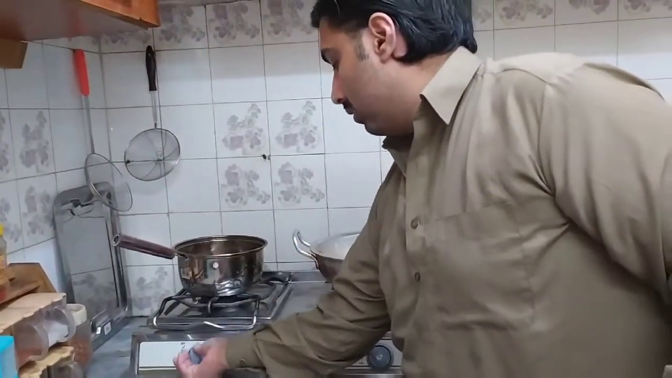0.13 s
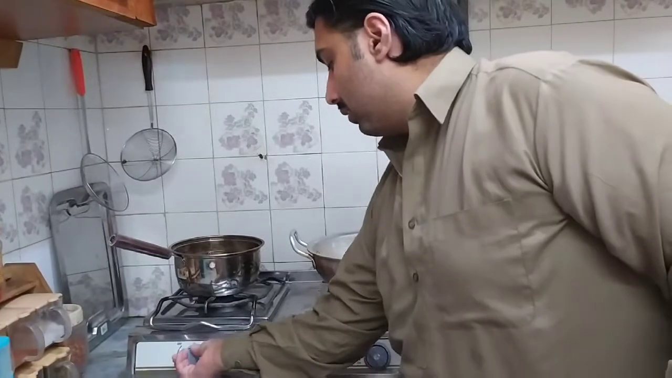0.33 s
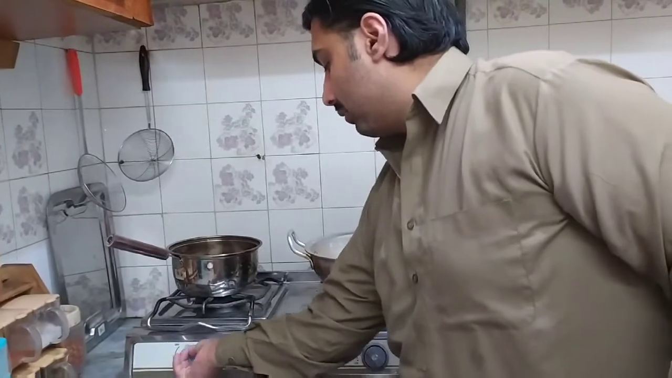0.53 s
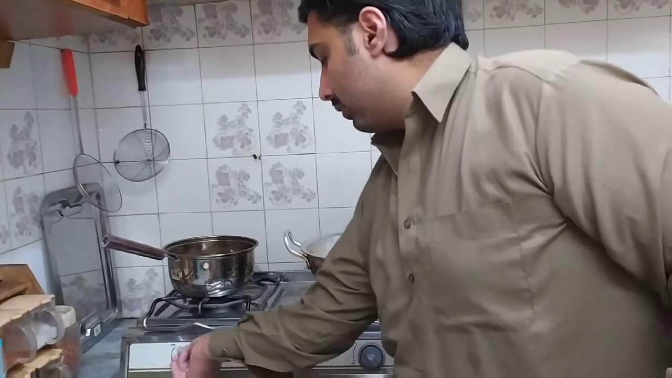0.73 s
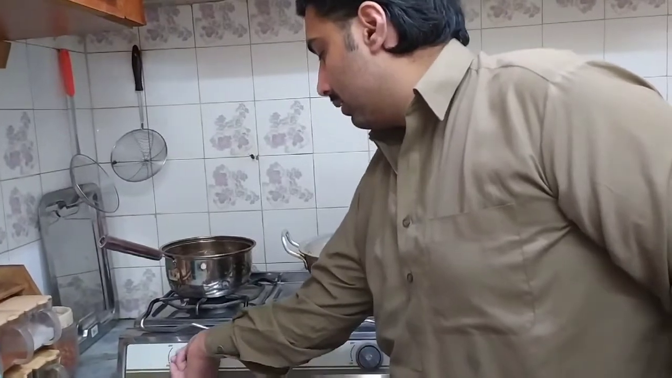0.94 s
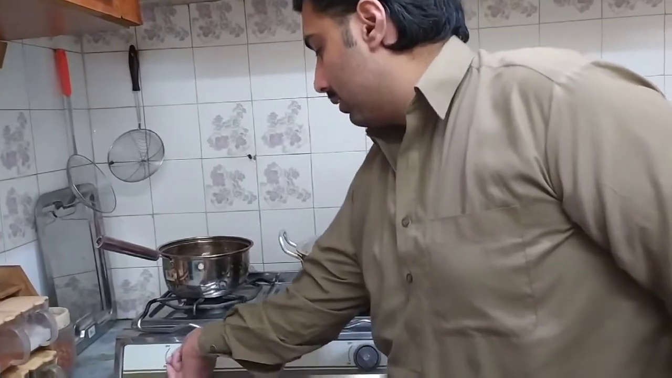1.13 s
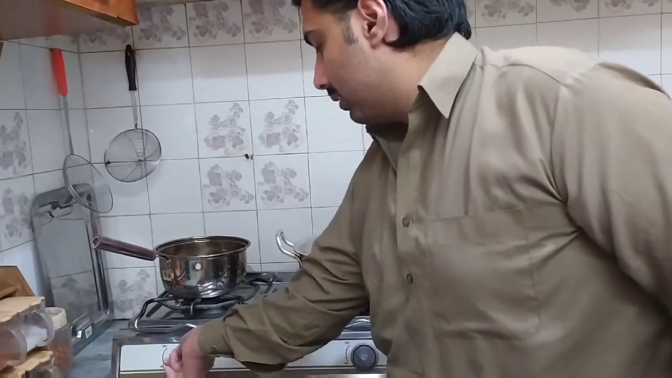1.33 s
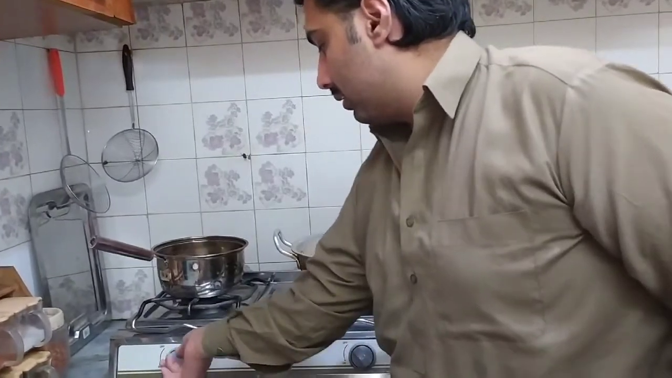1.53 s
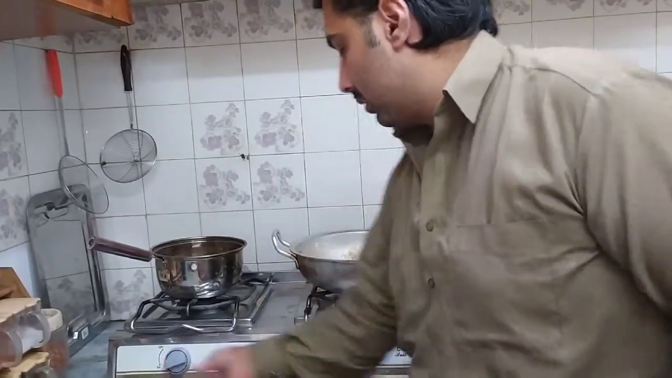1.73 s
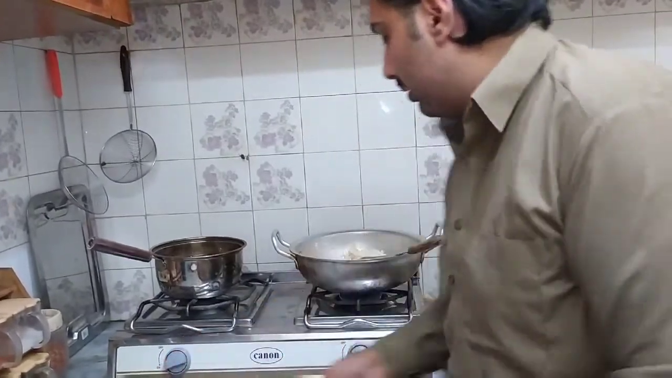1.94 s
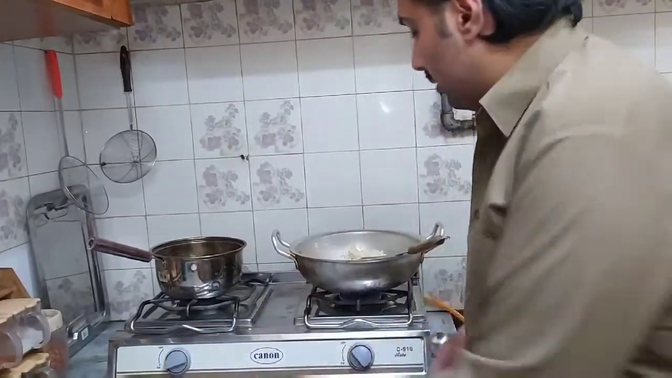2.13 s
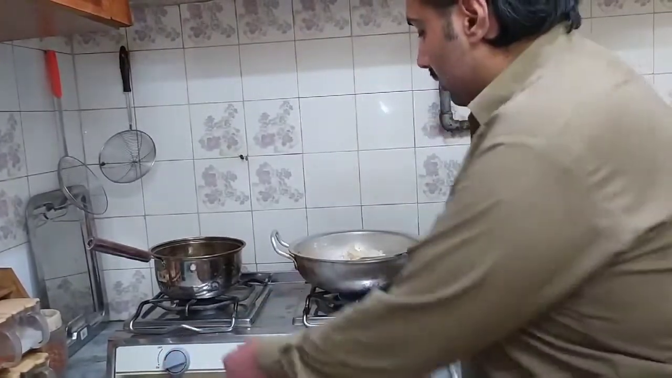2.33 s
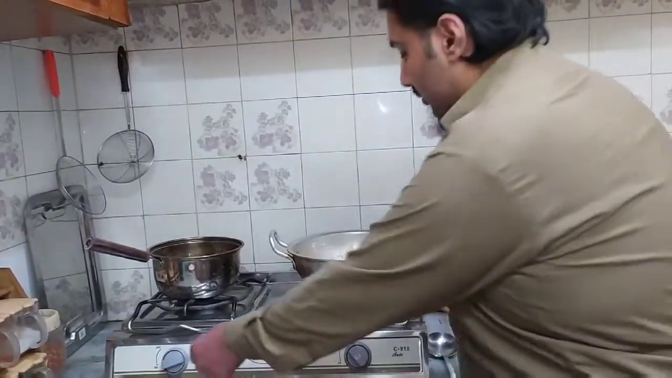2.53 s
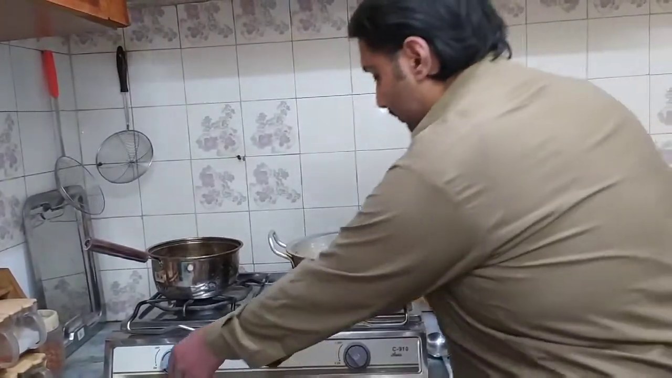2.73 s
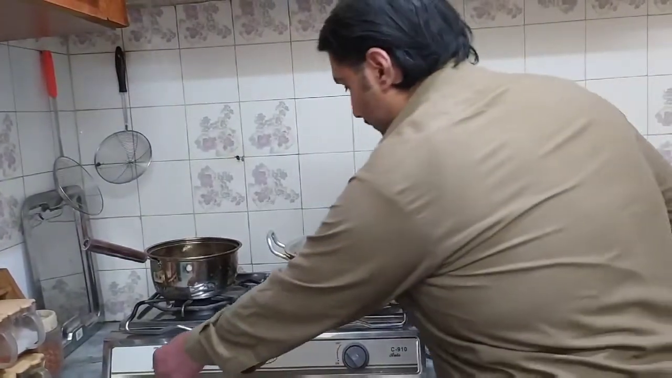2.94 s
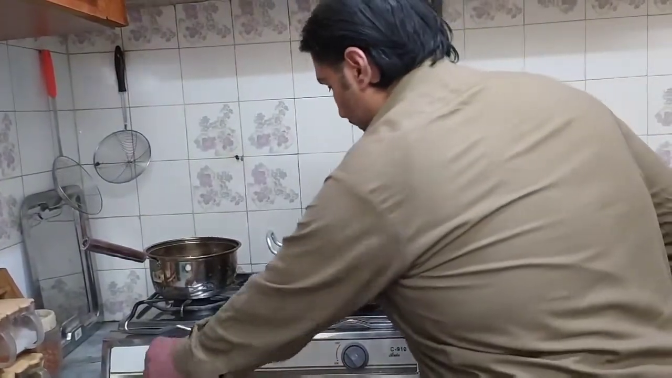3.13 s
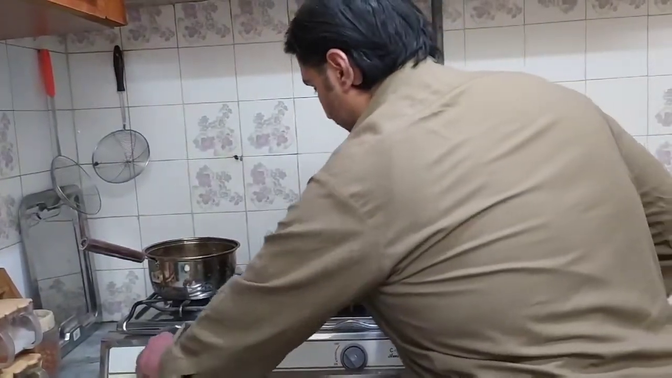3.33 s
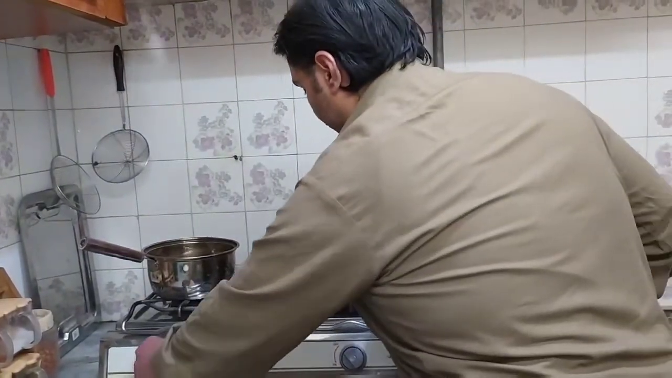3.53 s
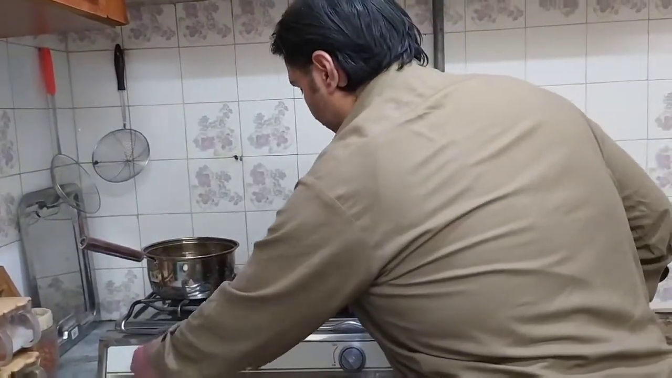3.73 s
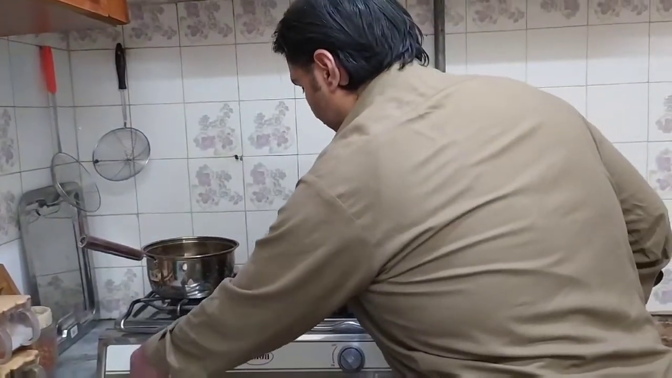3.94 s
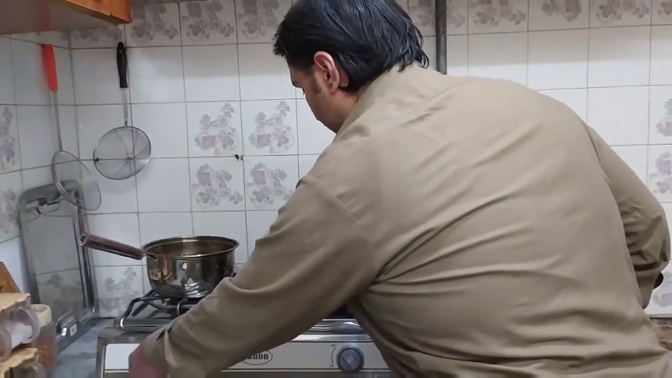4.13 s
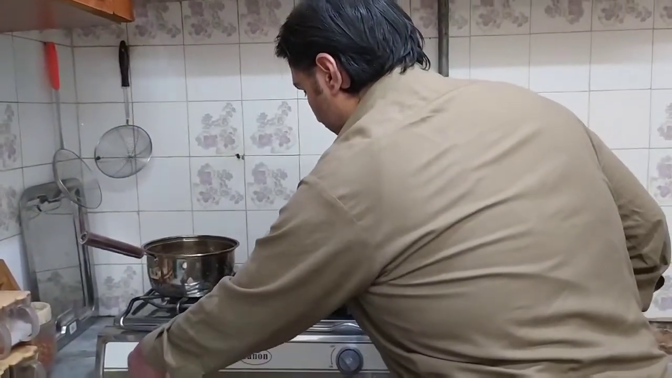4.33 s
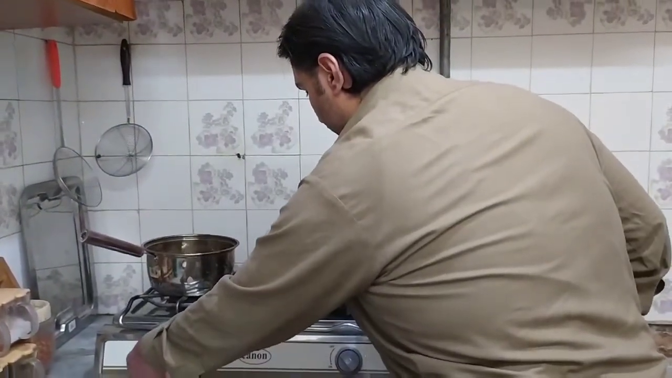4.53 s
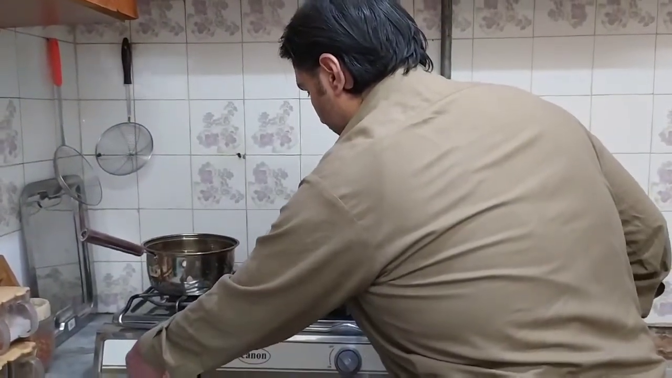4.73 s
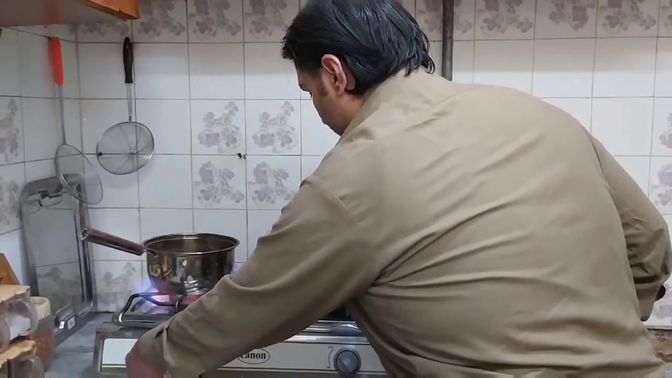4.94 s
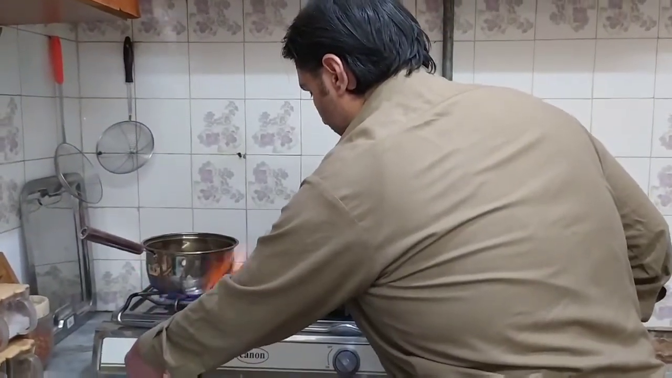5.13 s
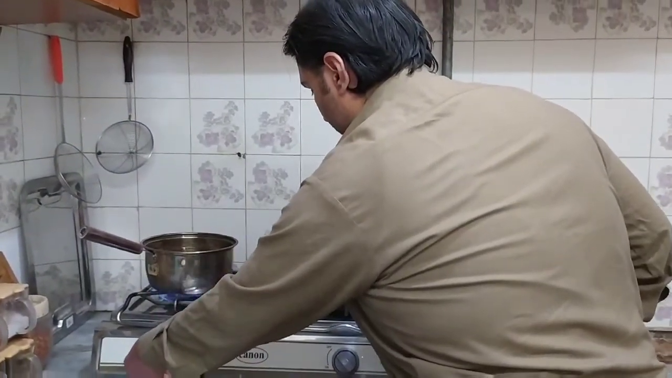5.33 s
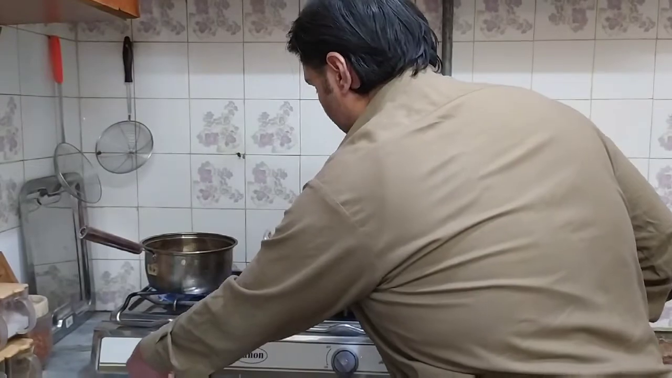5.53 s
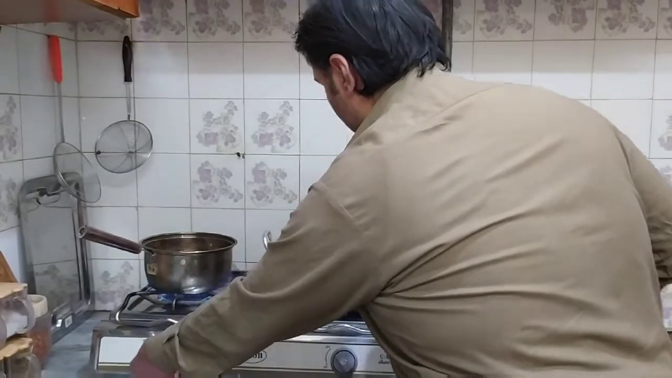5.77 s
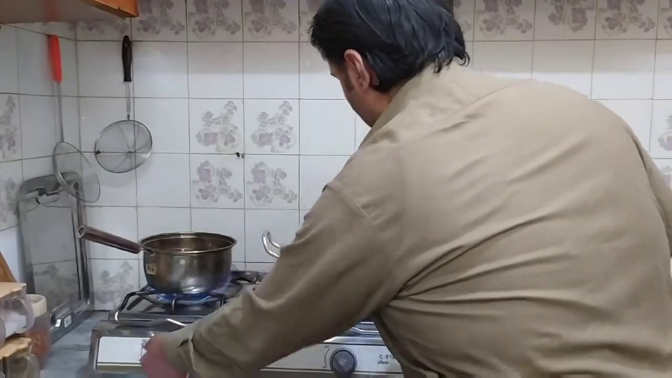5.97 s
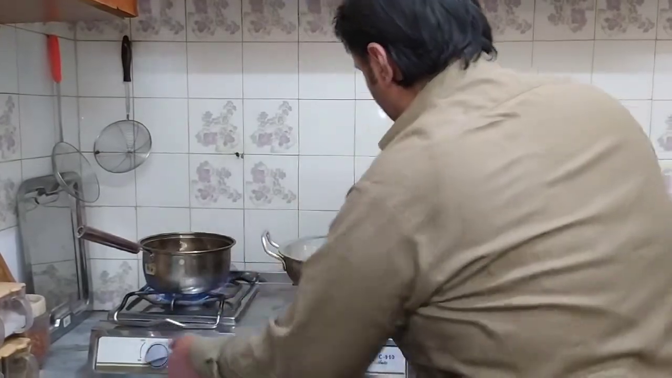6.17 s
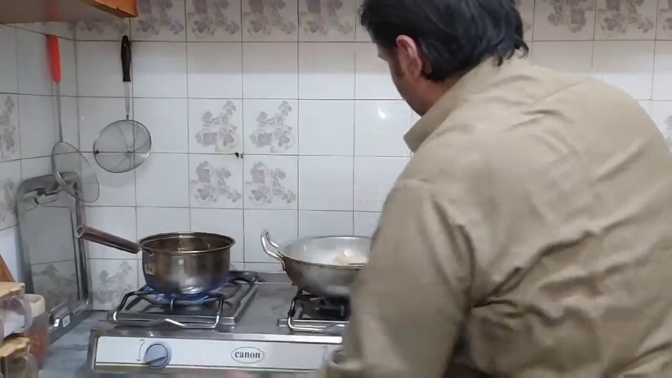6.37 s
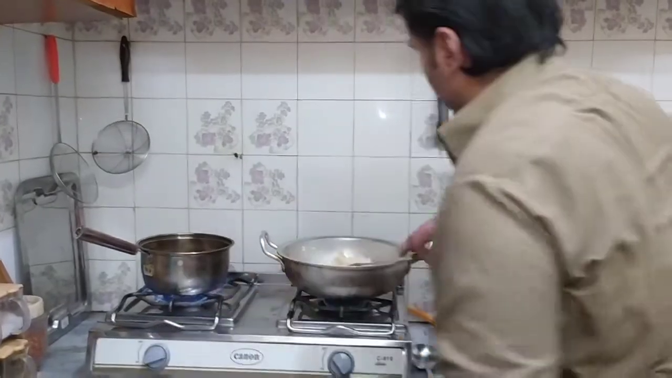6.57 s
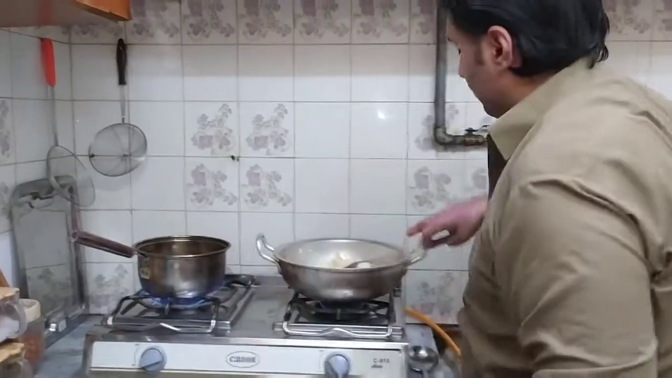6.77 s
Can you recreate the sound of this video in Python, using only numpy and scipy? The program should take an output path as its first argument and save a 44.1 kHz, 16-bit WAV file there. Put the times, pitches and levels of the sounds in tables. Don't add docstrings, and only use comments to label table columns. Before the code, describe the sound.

Thin gas hiss starts and stops around loud metallic igniter cracks, until the third snap lights a low, rough rush of flame under a pot.

```python
import sys
import numpy as np
from scipy import signal
from scipy.fft import rfft, irfft, next_fast_len
from scipy.io import wavfile
from scipy.ndimage import uniform_filter1d, map_coordinates

SR = 44100
rng = np.random.default_rng(int(sys.argv[2]) if len(sys.argv) > 2 else 0)


def elevation(decibels):
    levels = np.asarray(decibels, float)
    return 10 ** (levels / 20)


def inscribe(sig):
    pcm = np.round(np.clip(np.atleast_2d(sig).T, -1, 1) * 32767)
    wavfile.write(sys.argv[1], SR, pcm.astype(np.int16))


N = 299990


def unit(x):
    return x / np.sqrt(np.mean(x ** 2) + 1e-20)


def along(points, hz):
    f, v = np.transpose(points)
    return np.interp(np.log(hz + 1), np.log(f + 1), v)


def wobble(rate_hz, count=N):
    knots = rng.standard_normal(int(count * rate_hz / SR) + 4)
    return map_coordinates(knots, [np.arange(count) * rate_hz / SR])


def filtered(x, response):
    m = next_fast_len(len(x) + SR // 4)
    return irfft(rfft(x, m) * response(np.fft.rfftfreq(m, 1 / SR)), m)[:len(x)]


def shape(points):
    below = [(0, -120), (points[0][0] * 0.7, -70)]
    above = [(points[-1][0] * 1.05, -120)]
    return lambda hz: elevation(along(below + list(points) + above, hz))


def resonances(peaks):
    def response(f):
        total = 0
        for k, (centre_hz, width_hz, db) in enumerate(peaks):
            damping = 1j * f * width_hz
            total = total + (-1) ** k * elevation(db) * damping / (centre_hz ** 2 - f * f + damping)
        return total
    return response


def noise(response, count=N):
    return unit(filtered(rng.standard_normal(count), response))


def causal(x, points):
    gain = shape(points)(np.fft.rfftfreq(4096, 1 / SR))
    cepstrum = irfft(np.log(np.maximum(gain, 1e-5)))
    cepstrum[1:2048] *= 2
    cepstrum[2049:] = 0
    return signal.fftconvolve(x, irfft(np.exp(rfft(cepstrum))))[:len(x)]


def tail(scale, sparse_db):
    # (frequency [Hz], t60 [s])
    kitchen_t60 = [(100, 1.1), (300, 0.71), (700, 0.77), (1800, 0.62), (5000, 0.6), (9000, 0.46),
                   (14000, 0.47)]
    t = np.arange(SR) / SR
    sparse = elevation(sparse_db * np.exp(-t / 0.0099) * wobble(900, count=SR))
    echoes = rng.standard_normal(SR) * sparse
    hz, frame_s, z = signal.stft(echoes, SR, nperseg=256)
    t60_s = scale * along(kitchen_t60, hz)[:, None]
    return signal.istft(z * elevation(-60 * frame_s / t60_s), SR, nperseg=256)[1][:SR]


def background():
    # (time [s], level [dB], t60 [s])
    pushes = [(0.0, -53, 1), (.2, -56, 2.3), (1.17, -26, 0.32), (1.4, -53, 1.5), (1.702, -56, .7),
              (3.27, -49.5, 0.68), (4.15, -59, 0.89), (4.93, -33.5, 1.2), (5.5, -53, 0.97),
              (5.85, -58.5, 0.67), (6.1, -54, 0.85), (6.4, -59, .8), (6.65, -62, 1.6)]
    # (frequency [Hz], density [dB per Hz])
    rumble_colour = [(4, -4), (12, 21), (28, 6), (40, -13), (60, -38)]
    # (frequency [Hz], density [dB per Hz])
    floor_colour = [(8.8, -32.5), (15, 11.5), (36, -9), (109, -7.5), (220, -3), (303, -7), (543, -7),
                    (1030, -15.5), (1340, -9), (1850, -16), (2200, -13.5), (3940, -22), (7070, -22),
                    (9190, -20), (16000, -28)]
    floor_db, still_db, push_rise_s = -59.5, -74, 0.026
    t = np.arange(N) / SR
    sway = elevation(still_db)
    for start_s, db, t60_s in pushes:
        since = np.maximum(t - start_s, 0)
        sway = sway + elevation(db - 60 * since / t60_s) * (1 - np.exp(-since / push_rise_s))
    return elevation(floor_db) * noise(shape(floor_colour)) + sway * noise(shape(rumble_colour))


def touches():
    # (time [s], level [dB], rise [s], dull part [dB], bright part [dB])
    contacts = [(.117, -50.5, 0.0033, -3, -15), (.15, -68, 0.027, -3, 5.5), (.2, -64, 0.0089, 8, -4),
                (.46, -60, 0.012, -0.5, 2.5), (.53, -69.5, 0.02, 22.5, -10), (.56, -70, 0.011, 21.5, -12),
                (.635, -81, 0.011, 15, -8), (2.335, -54.5, 0.0094, -0.5, 8), (2.631, -62, 0.025, -9, 12),
                (2.676, -67, .01, -4, 0), (2.793, -47.5, 0.027, -8.5, 6.5), (2.86, -58, .007, 3, -6),
                (2.954, -63, 0.0036, 13, -6), (3.033, -44.5, .012, -2, -10), (3.069, -51, .009, -1.5, -15),
                (3.109, -64, 0.012, 6, -9), (3.15, -63, .013, -2.1, 1.1), (3.499, -68, 0.015, 16, -9),
                (3.65, -61, 0.014, -2.1, 1), (6.362, -56, 0.022, -2.5, -8)]
    # (frequency [Hz], width [Hz], level [dB])
    dull_peaks = [(247, 42, -2), (420, 44, 7), (657, 35, 3.5), (810, 26, 2), (1020, 76, -5.5)]
    # (frequency [Hz], density [dB per Hz])
    middle_colour = [(400, -46), (900, -2), (1500, -1), (2500, -6), (4000, -35), (6000, -33)]
    # (frequency [Hz], density [dB per Hz])
    bright_colour = [(2500, -0.5), (4000, -1.5), (6500, -2), (9000, -3), (12000, -5), (16000, -25)]
    t60_s = 0.39
    out, t = np.zeros(N + SR), np.arange(SR // 2) / SR
    count = len(t)
    for start_s, db, rise_s, dull_db, bright_db in contacts:
        burst = noise(shape(middle_colour), count)
        burst += elevation(dull_db) * noise(resonances(dull_peaks), count)
        burst += elevation(bright_db) * noise(shape(bright_colour), count)
        grit = elevation(0.33 * wobble(141, count))
        swell = np.minimum(t / rise_s, 1) * elevation(-60 * np.maximum(t - rise_s, 0) / t60_s)
        out[round(start_s * SR):][:count] += elevation(db) * burst * grit * swell
    return out[:N]


def thumps():
    # (time [s], level [dB], frequency [Hz], t60 [s])
    booms = [
        (0.6, -53, 115, 0.29),
        (3.439, -42, 95, 0.21),
        (3.519, -60, 169, .4),
        (3.62, -68, 200, 0.61),
        (3.741, -51, 420, 0.24),
        (5.039, -32, 91.6, 0.45),
        (5.56, -37.5, 232, 0.87),
    ]
    out, t = np.zeros(N + SR), np.arange(SR // 2) / SR
    for start_s, db, hz, t60_s in booms:
        boom = noise(resonances([(hz, 0.027 * hz, 0)]), len(t))
        swell = elevation(db - 60 * t / t60_s) * (1 - np.exp(-t / 0.0099))
        out[round(start_s * SR):][:len(t)] += swell * boom
    return out[:N]


def gas():
    # (open [s], shut [s], flow [dB], jet top at opening [dB], fade of top [dB per s])
    valve = [
        (0.73, 3.23, -54.5, -60, 30),
        (3.792, 6.5, -56, -60, 12),
    ]
    # (frequency [Hz], width [Hz], level [dB])
    tube_peaks = [(1307, 65, -3.5), (2157, 39, -11.5), (2762, 25.4, -7), (3460, 33, -14),
                  (4085, 121, -15.5), (4870, 20, -13.5)]
    # (frequency [Hz], density [dB per Hz])
    tube_bed = [(530, -37), (900, -14), (1330, -6.5), (2760, -14), (3260, -15.5), (4070, -18.5),
                (4470, -52), (4770, -25), (6000, -67), (7800, -54), (13200, -120)]
    # (frequency [Hz], density [dB per Hz])
    jet_colour = [(4550, -43), (4950, -9), (5840, -10.5), (6050, -6.5), (6730, -3.5), (7310, -4.5),
                  (8210, 0), (12500, -19.5), (15400, -25), (16000, -30)]
    # (frequency [Hz], density [dB per Hz])
    top_colour = [(9000, -34), (9800, -6.5), (10500, -0.5), (11200, -7.5), (12000, -24), (14000, -18),
                  (16000, -29)]
    # (frequency [Hz], width [Hz], level [dB])
    ridge_peaks = [(8140, 500, 1), (10100, 600, -1.5)]
    open_db_per_s, shut_db_per_s = 222, 256
    tube_lag_s, top_late_s = 0.053, 0.065
    rush_tube_db, rush_jet_db, rush_s = 2.5, 2, 0.12
    rush_per_fade = 0.025
    jet_db, top_rest_db, ridge_db = -1.5, -18, -4
    settled_flow_db, settled_top_db = -57.5, -76
    t = np.arange(N) / SR
    tube_gain, jet_gain, top_gain, ridge_gain = np.zeros((4, N))
    for open_s, shut_s, flow_db, top_db, fade in valve:
        since = np.maximum(t - open_s, 0)
        edge_db = -open_db_per_s * np.maximum(open_s - t, 0) - shut_db_per_s * np.maximum(t - shut_s, 0)
        rush = rush_per_fade * fade * since / rush_s * np.exp(1 - since / rush_s)
        lag_db = open_db_per_s * np.clip(open_s + tube_lag_s - t, 0, tube_lag_s)
        tube_gain += elevation(flow_db + edge_db - lag_db + rush_tube_db * rush)
        jet_gain += elevation(flow_db + jet_db + edge_db + rush_jet_db * rush)
        ridge_gain += rush * elevation(flow_db + ridge_db + edge_db)
        fading_db = np.maximum(top_db - fade * since, flow_db + top_rest_db)
        top_gain += elevation(fading_db + edge_db - 7.5 * np.exp(-since / top_late_s))
    settled = np.clip((t - valve[-1][1]) / 0.04, 0, 1)
    steady = settled * elevation(settled_flow_db)

    def pipe(hz):
        return resonances(tube_peaks)(hz) / (1 + (1000 / (hz + 1)) ** 4)

    tube = unit(noise(pipe) + elevation(0.5) * noise(shape(tube_bed)))
    surge = elevation(0.7 * wobble(9))
    hiss = (tube_gain + steady) * tube
    hiss += (jet_gain + elevation(jet_db) * steady) * noise(shape(jet_colour))
    hiss += ridge_gain * noise(lambda hz: resonances(ridge_peaks)(hz) ** 2)
    top = elevation(5.5) * (top_gain + settled * elevation(settled_top_db)) * noise(shape(top_colour))
    return surge * hiss + top


def whistle():
    # (time [s], hold [s], pitch [Hz], level [dB], half-pitch level [dB])
    cracks = [
        (0.738, 0.0093, 5480, -45.5, -12),
        (3.188, 0.024, 5410, -52, -0.5),
        (3.796, .03, 5360, -55, -4),
    ]
    # (frequency [Hz], density [dB per Hz])
    spray_colour = [(11500, -32), (13000, -5), (14000, -2), (15000, -6), (16000, -25)]
    rise_db_per_s, fall_db_per_s = 730, 260
    glide_hz, glide_s = 200, 0.024
    flat_hz_per_db = 4
    width_hz, width_hz_per_db = 380, 14
    out, t = np.zeros(N), np.arange(N) / SR
    for start_s, hold_s, hz, db, half_db in cracks:
        under_db = rise_db_per_s * np.maximum(start_s - t, 0)
        under_db += fall_db_per_s * np.maximum(t - start_s - hold_s, 0)
        pitch_hz = hz - glide_hz * np.clip((start_s - t) / glide_s, 0, 2)
        pitch_hz -= flat_hz_per_db * np.minimum(under_db, 40)
        half_phase = np.pi * np.cumsum(pitch_hz) / SR
        gate = np.clip((37 - under_db) / 8, 0, 1)
        blur_hz = width_hz + width_hz_per_db * half_db
        tone = wobble(blur_hz) * np.sin(2 * half_phase) + wobble(blur_hz) * np.cos(2 * half_phase)
        half = wobble(180) * np.sin(half_phase) + wobble(180) * np.cos(half_phase)
        spray = elevation(0.32 * (db - under_db) - 52) * noise(shape(spray_colour))
        out += gate * (elevation(db - under_db) * (tone + elevation(half_db) * half) + spray)
    return out


def igniter():
    # (time [s], peak [dB], hold [s], decay scale [1])
    snaps = [
        (1.164, -5.5, 0.058, 0.82),
        (3.284, -9, 0.039, 0.65),
        (4.9148, -6, 0.019, 0.88),
    ]
    # (frequency [Hz], density [dB per Hz])
    snap_colours = [
        [(35, -46), (60, -28), (108, -29.5), (212, -4.5), (287, -10.5), (389, 1.5), (492, -5.5), (651, -5),
         (1310, -6.5), (1660, -1.5), (3340, -7.5), (4320, -4.5), (5210, -8), (9130, -2), (16000, -25.5)],
        [(35, -92), (60, -63), (222, -28), (315, -41), (437, -12), (593, -27), (882, -17), (1040, -19.5),
         (1660, -13.5), (1820, -11), (2000, -16), (4320, -8.5), (5090, -10), (8920, 0), (16000, -25)],
        [(35, -39), (60, -16), (268, -14.5), (417, -1.5), (666, -6), (803, -13.5), (882, -6), (1340, -10),
         (1440, -6), (2090, -6.5), (4530, -12.5), (4970, -11.5), (8920, -6.5), (14600, -22), (16000, -45)],
    ]
    # (frequency [Hz], level [dB], t60 [s])
    panel_modes = [(400.3, -20.5, 1), (639, -10, 0.92), (993, -23, 0.33), (1682, 3, 0.35), (1720, 1, 0.23),
                   (2113, -12, .3), (2830, 5, 0.26)]
    crack_db, crack_s = -3.5, 0.00066
    out, t, lead_s = np.zeros(N + SR), np.arange(SR) / SR, np.arange(-200, 0) / SR
    for (start_s, db, hold_s, scale), colour in zip(snaps, snap_colours):
        answer = causal(tail(scale, sparse_db=1.5), colour)
        answer /= np.std(answer[:SR // 20])
        ring = np.zeros(SR)
        for hz, level_db, t60_s in panel_modes:
            phase = 2 * np.pi * hz * t + 2.0 * wobble(63.4, SR)
            ring += elevation(level_db - 60 * t / t60_s) * np.sin(phase) * wobble(36.5, SR)
        ring = filtered(ring, lambda hz: elevation(0.77 * along(colour, hz)))
        build = 1 - np.exp(-t / 0.00065)
        build *= 1 - 0.42 * np.exp(-t / hold_s) + 0.63 * np.exp(-t / 0.0015)
        start = round(start_s * SR)
        out[start:][:SR] += elevation(db - 10.5) * build * (answer + elevation(-7) * ring)
        spark = rng.standard_normal(SR // 100) * np.exp(-t[:SR // 100] / crack_s)
        crack = filtered(spark, resonances([(9900, 5700, 0)]))
        out[start:][:len(crack)] += elevation(db + crack_db) * crack
        scrape = np.exp(lead_s / 0.00075) * answer[400:400 + len(lead_s)]
        out[start - len(lead_s):start] += elevation(db - 20) * scrape
    return out[:N]


def flame():
    # (time [s], level [dB])
    strength = [
        (4.93, -50),
        (5.0, -36),
        (5.13, -42),
        (5.19, -39),
        (5.4, -38),
        (5.58, -37.5),
        (5.63, -54),
        (5.7, -70),
    ]
    # (frequency [Hz], width [Hz], level [dB])
    burner_peaks = [(84, 21, -7), (116.3, 10.4, 1), (175.7, 11.7, 2.5), (211, 23, -1.5), (230.6, 17, 2),
                    (341, 31, -7.5), (398, 22, -1), (438, 21.6, 2.5), (660, 71, -10)]
    # (frequency [Hz], density [dB per Hz])
    crackle_colour = [(290, -27), (500, 1), (535, 0), (1030, -11.5), (1390, -6.5), (2120, -7.5),
                      (2300, -11), (2820, -12), (5140, -24.5), (8290, -22.5), (13000, -31.5)]
    crackle_over_roar_db, crackle_late_s = -7.5, 0.11
    t = np.arange(N) / SR
    knots_s, knots_db = np.transpose([(4.9, -140)] + strength + [(5.75, -140)])
    roar_db = np.interp(t, knots_s, knots_db)
    since = np.maximum(t - strength[1][0], 0)
    crackle_db = roar_db + crackle_over_roar_db - 18 * np.exp(-since / crackle_late_s)
    flutter_db = 1.6 * wobble(45) + 0.8 * wobble(15)
    puffs = elevation(roar_db + flutter_db) * rng.standard_normal(N)

    def hollow(hz):
        return resonances(burner_peaks)(hz) / (1 + (65 / (hz + 1)) ** 4) / (1 + (hz / 600) ** 4)

    roar = filtered(puffs, hollow) / np.std(filtered(rng.standard_normal(N), hollow))
    direct = roar + elevation(crackle_db + flutter_db / 2) * noise(shape(crackle_colour))
    walls = tail(0.75, sparse_db=0)
    return direct + elevation(-2.5) * signal.fftconvolve(direct, walls / np.linalg.norm(walls))[:N]


def gated(x):
    # (frequency [Hz], threshold [dB])
    threshold = [(2600, -20), (3100, -1.5), (4500, -.3), (6000, -.6), (7200, -3.2), (10000, -2.6),
                 (11500, .2), (16000, 1.4)]
    hz, _, z = signal.stft(x, SR, nperseg=2048)

    def patch(v):
        return uniform_filter1d(uniform_filter1d(v, size=7, axis=1), size=2, axis=2)

    power = np.abs(z) ** 2
    near = np.abs(patch(power)) + 1e-20
    wide = np.exp(uniform_filter1d(np.log(near), size=70, axis=1))
    total = power.sum(axis=1, keepdims=True)
    blow = total > 30 * np.roll(total, 2, axis=2)
    gate_db = along(threshold, hz)[:, None] + 1.8 * unit(patch(rng.standard_normal(z.shape)))
    kept = blow | (near > wide * elevation(2 * gate_db))
    return signal.istft(z * kept * (hz < 15900)[:, None], SR, nperseg=2048)[1][:, :N]


def scene():
    handling = background() + touches() + thumps()
    burner = gas() + whistle() + igniter() + flame()
    return (handling + burner)[None]


def top_cut(x):
    return signal.sosfilt(signal.butter(12, 16860, fs=SR, output="sos"), x)


def record(dry):
    # (frequency [Hz], width [Hz], level [dB])
    port_peak = [(9250, 1860, -5)]
    heard = filtered(dry[0], lambda hz: 1 + resonances(port_peak)(hz))[None]
    held = heard / (1 + np.abs(heard / 0.6) ** 4) ** (1 / 4)
    return top_cut(gated(held))


dry = scene()
out = record(dry)
inscribe(out)
```